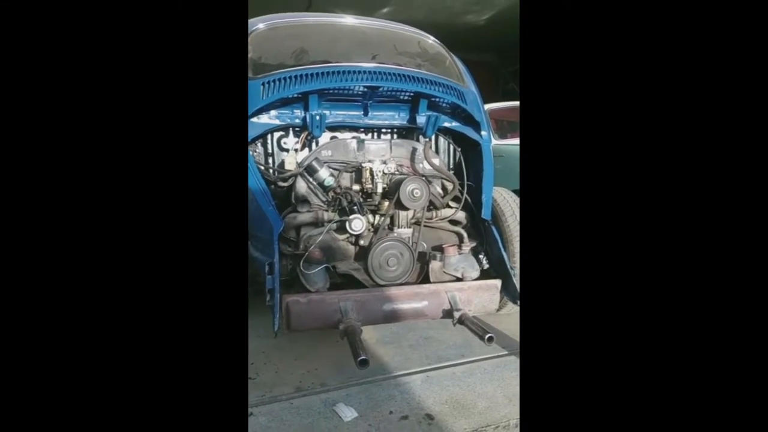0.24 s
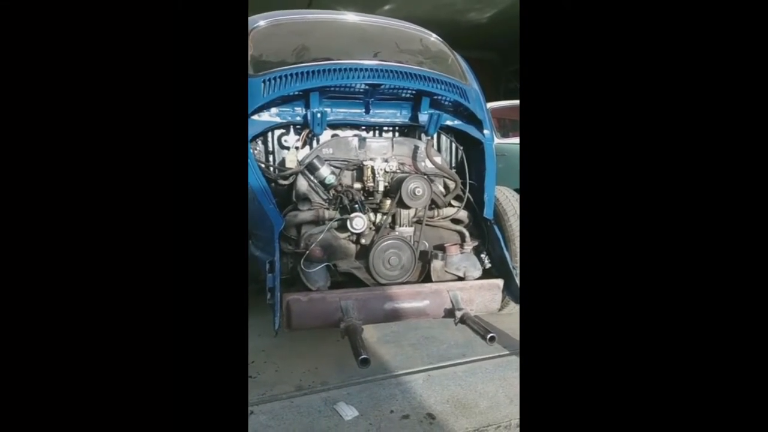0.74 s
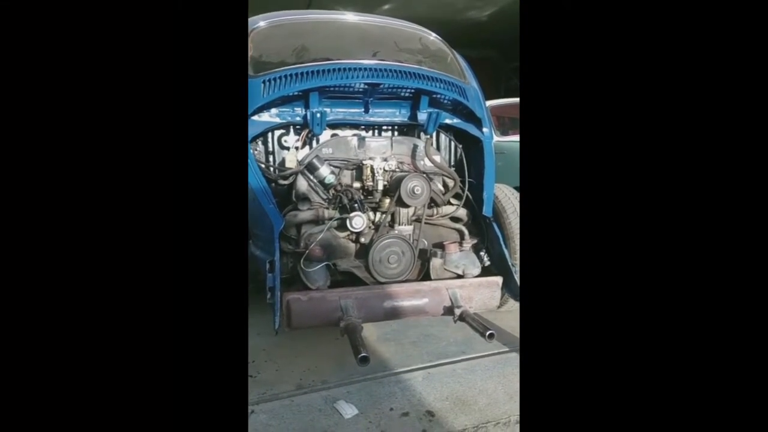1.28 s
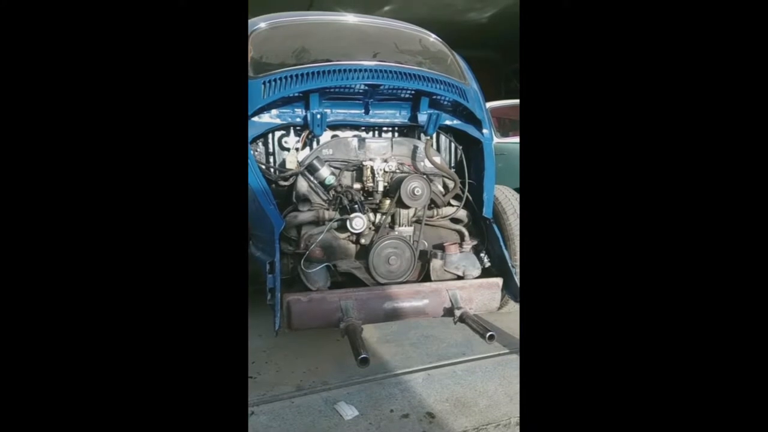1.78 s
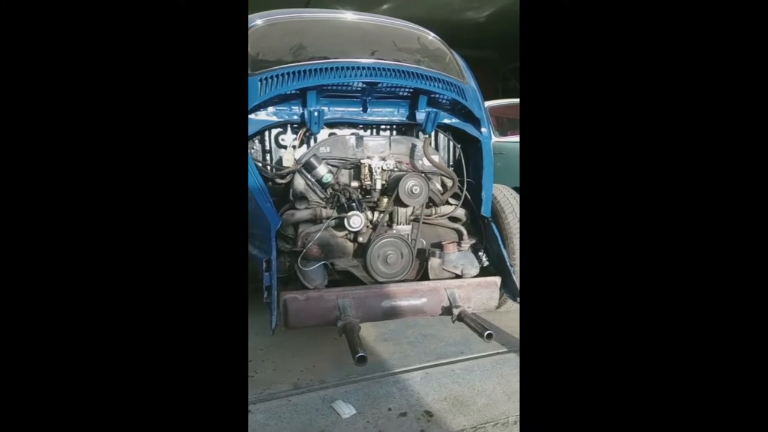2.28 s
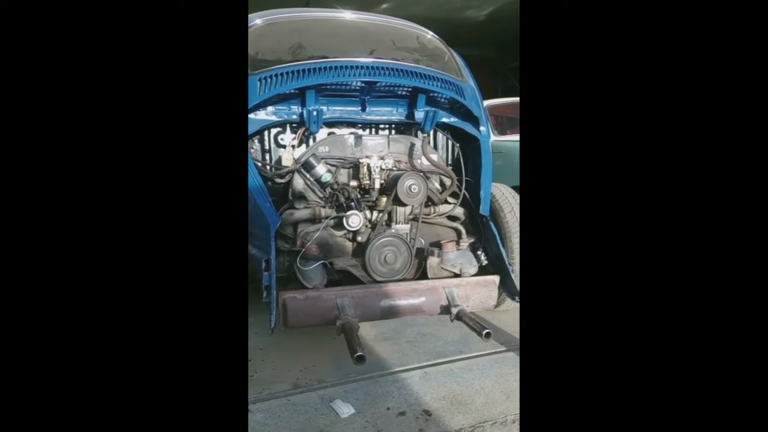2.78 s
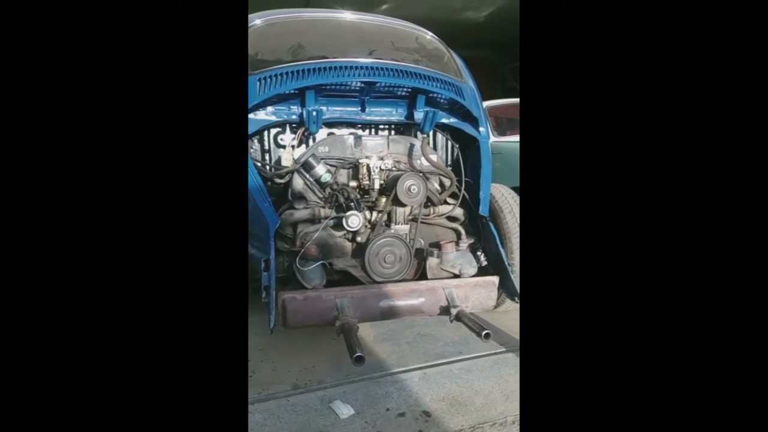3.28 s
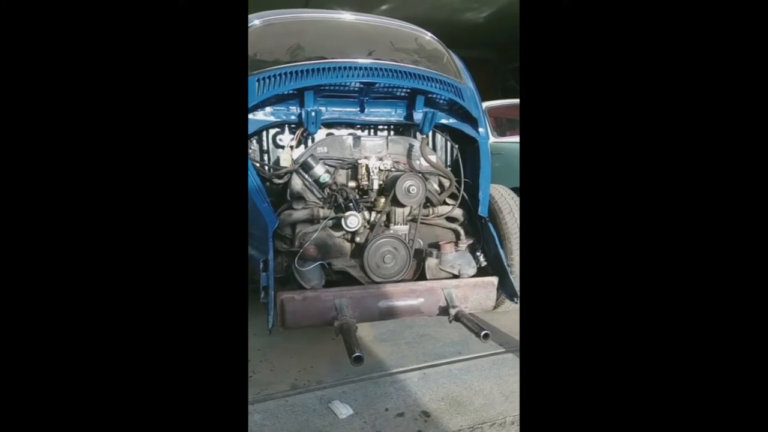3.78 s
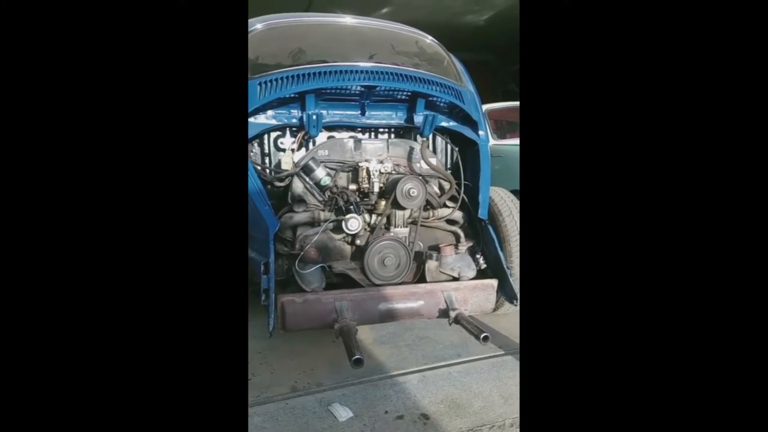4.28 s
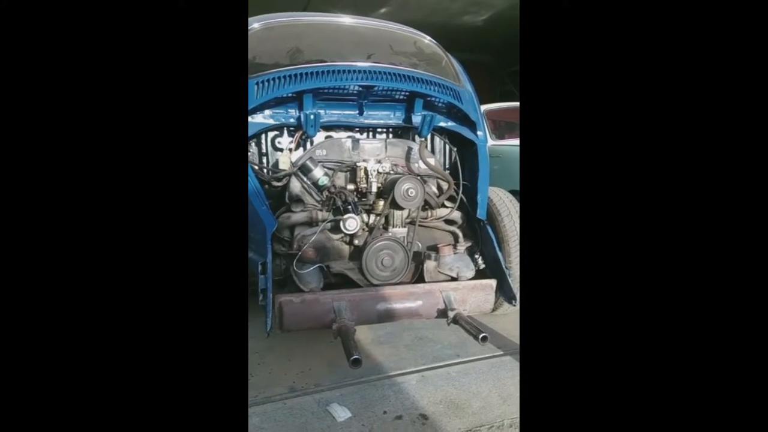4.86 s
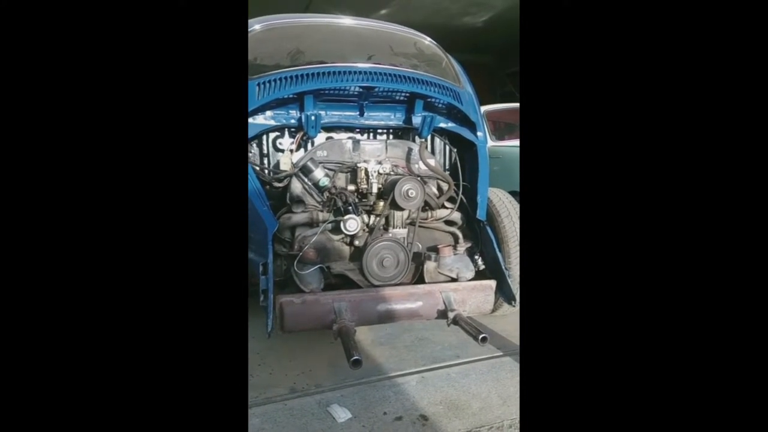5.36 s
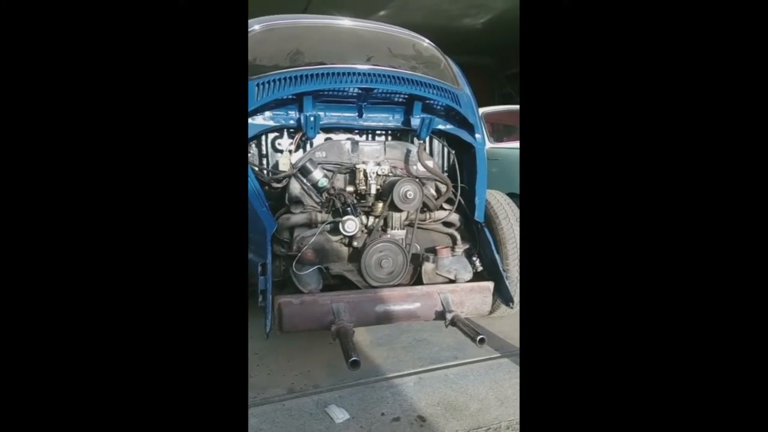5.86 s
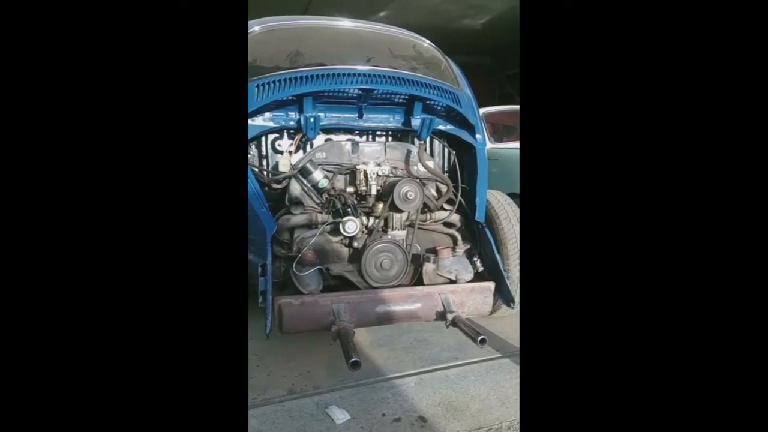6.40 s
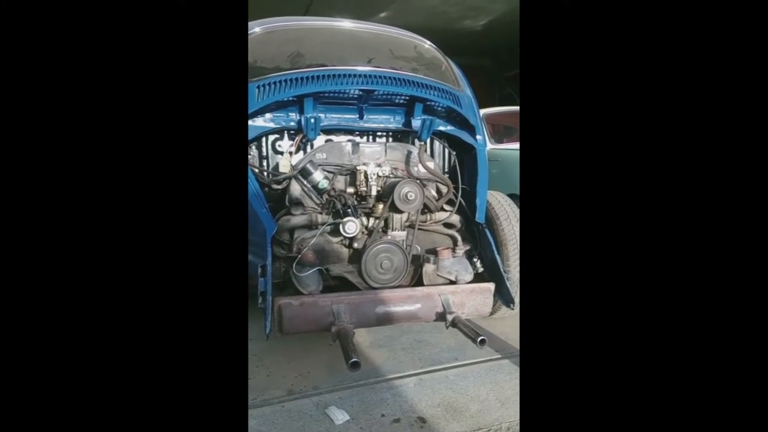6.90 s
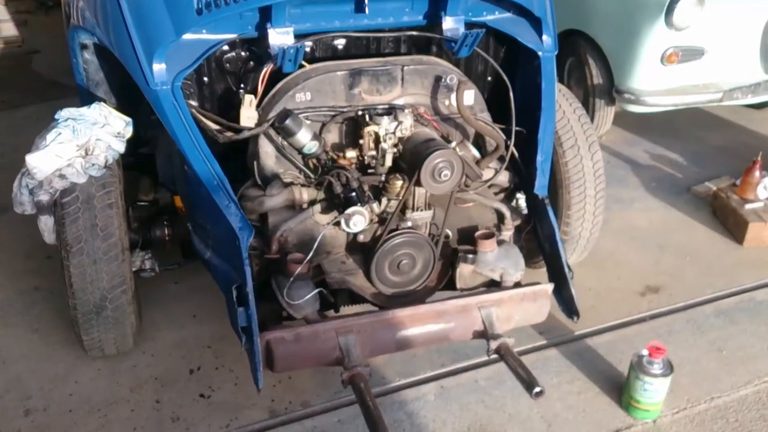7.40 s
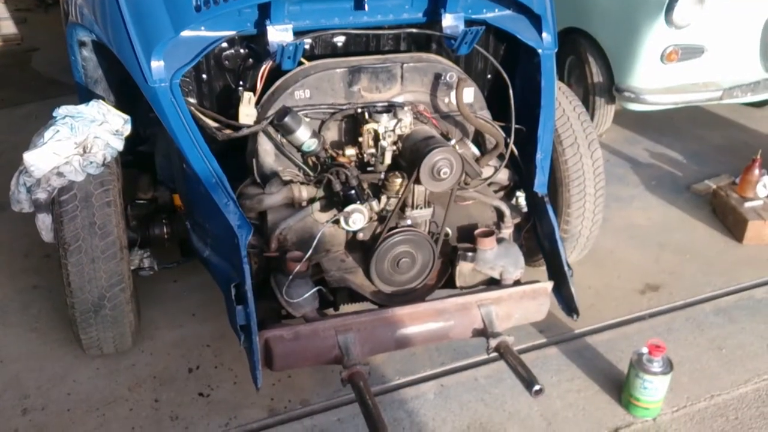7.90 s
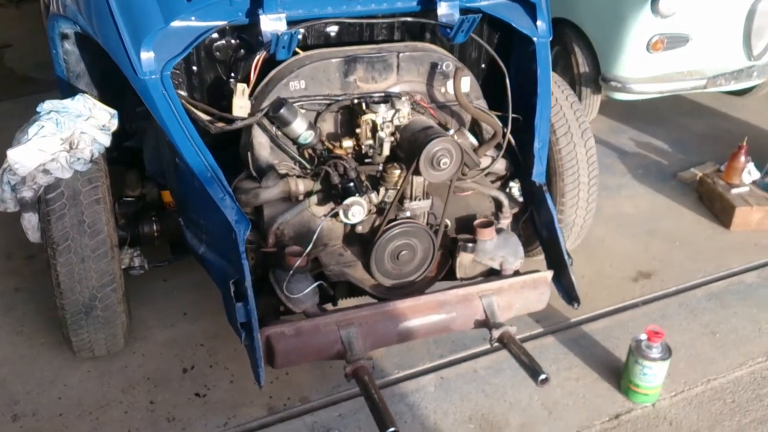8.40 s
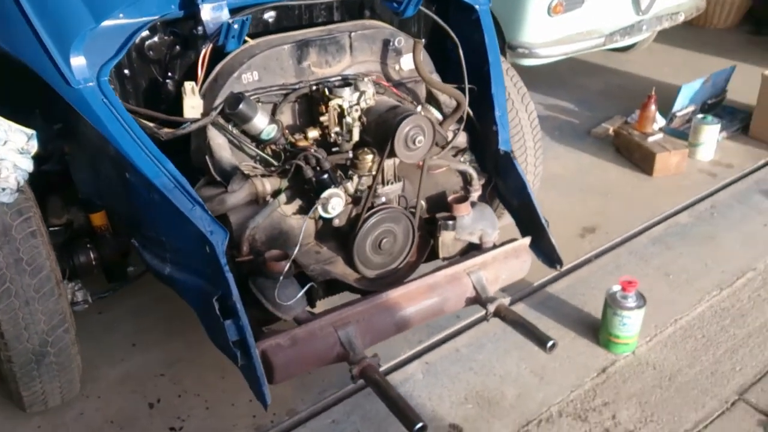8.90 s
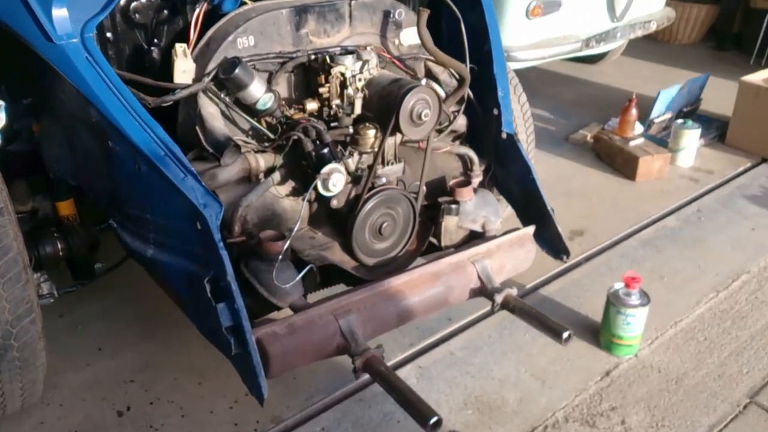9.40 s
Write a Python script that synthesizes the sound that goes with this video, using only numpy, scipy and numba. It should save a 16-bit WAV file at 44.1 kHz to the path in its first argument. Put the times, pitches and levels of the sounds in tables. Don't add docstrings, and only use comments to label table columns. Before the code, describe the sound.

An air-cooled engine idles fast and rough with clattering valves and fan roar, fades briefly to silence, then returns quieter with soft exhaust pops.

```python
import sys
import numpy as np
from scipy import signal
from scipy.fft import rfft, irfft, dct, next_fast_len
from scipy.io import wavfile
from scipy.ndimage import uniform_filter1d
from numba import njit

SR = 44100
rng = np.random.default_rng(int(sys.argv[2]) if len(sys.argv) > 2 else 0)


def ratio(d):
    e = np.asarray(d, float) / 20
    return 10 ** e


def to_wav(s):
    ch = np.atleast_2d(s).T
    pcm = np.round(np.clip(ch, -1, 1) * 32767)
    wavfile.write(sys.argv[1], SR, pcm.astype(np.int16))


N = 425565


def level(x, db):
    return x * ratio(db) / np.sqrt(np.mean(x ** 2))


def on_log(hz, table):
    return np.interp(np.log(hz), np.log([r[0] for r in table]), [r[1] for r in table])


def walk(count, rate):
    hold = int(SR / rate)
    steps = np.repeat(rng.standard_normal(count // hold + 1), hold)
    return 1.4 * uniform_filter1d(steps, hold)[:count]


def train(count, when, size):
    return np.bincount(np.clip(when * SR, 0, count - 1).astype(int), size, count)


def ring(x, hz, t60):
    t = np.arange(int(t60 * SR)) / SR
    mode = np.sin(2 * np.pi * hz * t) * 1000. ** (-t / t60)
    return signal.oaconvolve(x, mode)[:len(x)]


def puff(x, hz, swell_s=.0065):
    t = np.arange(SR // 16) / SR
    cycles = np.sin(2 * np.pi * hz * t) * t / swell_s * np.exp(1 - t / swell_s)
    return signal.oaconvolve(x, cycles)[:len(x)]


RUMBLE_DB = [-31, -36.5]


def rumble(count, view):
    band = signal.butter(2, (20, 120), "band", fs=SR, output="sos")
    return level(signal.sosfilt(band, rng.standard_normal(count)), RUMBLE_DB[view])


# (frequency [Hz], spectral density [dB per Hz])
BODY = [
    [(180, -3), (310, -7.5), (515, -7.5), (727, -1.5), (900, -6.5), (1150, -2.5), (1310, -5.5), (2150, -9),
     (2450, -14.5), (2700, -11.5), (3630, -12), (4200, -9.5), (6330, -12.5), (7970, -11.5), (15600, -26.5)],
    [(180, -3.5), (300, -7.5), (384, -9), (469, -1.5), (879, -3.5), (970, -7), (1570, -6.5), (2220, -10),
     (3190, -7), (3470, -9), (5240, -13), (6500, -11.5), (9820, -18.5), (12400, -7), (15600, -19.5)],
]
BODY_DB = [-19.5, -22]
# (frequency [Hz], width [Hz], lift [dB])
SHROUD = [
    [(566, 55, 4.5), (740, 130, 1), (1140, 61, 2), (2180, 170, 6), (2760, 120, 3), (7620, 1450, 4)],
    [(626, 200, -0.5), (1606, 60, 4.5), (3125, 120, 2), (6970, 190, -0.5), (7430, 330, 1.5)],
]
# (frequency [Hz], level against the steady fan [dB])
BURSTS = [(300, -5), (700, -4), (1500, -3), (3000, -3), (4300, -11), (8000, 1), (12000, 1.5)]
CYLINDER_DB = [
    [-5, -6.5, -2, -6.5],
    [-5.5, -3, -5, -4],
]
KNOCK_S = [0.018, 0.015, .011, 0.0088, .0073, 0.0069, .0073]
CLICK_LEAD_S = [
    [.004, .0054, .0064, .0054],
    [.0076, .0062, .0062, .007],
]


def valve_knocks(t, fired, view, chance):
    gates = []
    for part, (own, knock_s) in enumerate(zip(chance[1:], KNOCK_S)):
        decay = np.exp(-np.arange(SR // 20) / SR / knock_s)
        lead = .004 if part < 4 else np.resize(CLICK_LEAD_S[view], len(fired))
        hits = ratio(np.resize(CYLINDER_DB[view], len(fired)) + 1.9 * chance[0] + 2.74 * own)
        knocks = train(len(t), fired - t[0] - lead, hits)
        gates.append(level(signal.oaconvolve(knocks, decay)[:len(t)], 0))
    return gates


def machinery(t, fired, view, swell_db):
    n, size = len(t), next_fast_len(len(t))
    hz = np.arange(1, size // 2 + 2) * SR / size
    octave = np.log2(hz)
    colour_db = on_log(hz, BODY[view])
    for mode_hz, width, lift_db in SHROUD[view]:
        colour_db = colour_db + lift_db / (1 + (2 * (hz - mode_hz) / width) ** 2)
    ripple = uniform_filter1d(rng.standard_normal(len(hz)), size=size // 2500)
    colour_db += 1.3 * level(ripple, 0)
    noise = rfft(rng.standard_normal(size)) * ratio(colour_db)
    chance = np.clip(rng.standard_normal((len(fired), 8)).T, -2, 1.7)
    gates = valve_knocks(t, fired, view, chance)
    out, gust = 0, walk(n, 5.8)
    for k, centre in enumerate(200 * 2 ** (np.arange(20) / 3)):
        weight = np.clip(1 - abs(3 * (octave - np.log2(centre))), 0, 1)
        band = irfft(noise * weight, size)[:n]
        gate = np.sqrt(1 + (ratio(on_log(centre, BURSTS)) * gates[k // 3]) ** 2)
        region = int(centre > 2800) + int(centre > 5800)
        db = swell_db[region] + .35 * gust + 1.1 * walk(n, 19)
        out = out + band * level(gate, 0) * ratio(db)
    return level(out, BODY_DB[view])


# (frequency [Hz], level [dB], t60 [s])
TAPPET = [
    [(4055, -36.5, 0.026), (4410, -37, 0.039), (4800, -40, 0.01), (5140, -40.5, 0.022), (8170, -37.5, .015)],
    [(3160, -52, 0.027), (6620, -50, .03), (12240, -43, 0.013)],
]
# (cylinder [index], lead before firing [s])
TAPPET_AT = [(2, .004), (0, .006)]


def tappet(t, fired, view):
    cylinder, lead = TAPPET_AT[view]
    when, out = fired[cylinder::4] - t[0] - lead, 0
    chance = np.clip(rng.standard_normal((len(when), 6)).T, -2, 1.3)
    decay = np.exp(-np.arange(SR // 40) / SR / .006)
    for k, (hz, db, t60) in enumerate(TAPPET[view]):
        strength = ratio(1.8 * chance[-1] + 1.7 * chance[k])
        hits = train(len(t), when + .0012 * chance[k - 1], strength)
        rattle = signal.oaconvolve(hits, decay)[:len(t)] * rng.standard_normal(len(t))
        out = out + level(ring(rattle, hz, t60), db)
    return out


# (time [s], level [dB], frequency [Hz])
POPS = [
    (8.0945, -9.5, 66),
    (8.138, -18, 65),
    (8.217, -22, 70),
    (8.425, -19, 70),
    (8.84, -20, 70),
    (8.93, -20, 65),
    (9.612, -21, 70),
]


def pops():
    out = 0
    for s, db, hz in POPS:
        out = out - 1.6 * ratio(db) * ring(train(N, np.array([s]), [1.]), hz, .075)
    return out


# (frequency [Hz], t60 [s], near bank gain, far bank gain); minus is a suction wave
SILENCER = [
    [(67.6, .121, -.465, -.443), (90.9, .049, -.227, .517), (165.8, .12, .494, .025),
     (226.9, .12, .025, -.12), (290, .07, .085, .015)],
    [(55, .051, -.447, -.127), (85, .12, .885, -.32), (185.7, .113, -.294, .386), (271.6, .12, -.34, .014),
     (355, .1, .04, .04)],
]
# (size scatter [dB], time scatter [s],
# mismatch of paired cylinders in the top modes [0-1], uneven burn [0-1])
BLOW = [(.5, .0001, .1, .1), (.5, .0001, .5, .09)]
# (near bank [s], far bank [s])
LEAD_S = [(.01, .0111), (.0003, -.0034)]
# (time [s], level [dB])
MISFIRES = [(0.227, -4), (0.542, -18), (0.921, -20), (1.166, 0), (1.234, -3), (1.617, -6), (1.81, -6),
            (1.943, -18), (2.073, -20), (2.324, -3), (2.451, -7), (2.707, 1), (2.739, -11), (3.864, -21),
            (4.313, -20), (4.367, -2), (4.442, -10), (4.664, 0), (4.707, -19), (5.156, -4), (5.488, -11),
            (5.821, -24), (6.603, -15)]
# (cylinder [index], delay [s], frequency [Hz], size)
CHUG = [(2, .0071, 245, .27), (0, .0044, 248, .32)]


def exhaust(t, fired, view):
    scatter_db, jitter, mismatch, uneven = BLOW[view]
    n, count = len(t), len(fired)
    chance = rng.standard_normal((count, 3)).T
    when = fired - t[0] - np.resize(LEAD_S[view], count) + jitter * chance[1]
    out = 0
    for k, (hz, t60, near, far) in enumerate(SILENCER[view]):
        pair = mismatch * (k >= 3)
        gain = np.resize([near * (1 + pair), far, near * (1 - pair), far], count)
        out = out + ring(train(n, when, gain * ratio(scatter_db * chance[0])), hz, t60)
    out = level(signal.oaconvolve(out, signal.windows.gaussian(161, 22), "same"), 0)
    far_fired = fired[1::2]
    cough = uneven * chance[2, 1::2]
    for s, db in MISFIRES:
        if t[0] < s < t[-1]:
            cough[np.argmin(abs(far_fired - s))] = 1.56 * (1 - ratio(db))
    cylinder, late, hz, size = CHUG[view]
    chugs = train(n, fired[cylinder::4] - t[0] + late, size * ratio(2 * chance[0, cylinder::4]))
    out += puff(chugs, hz, .005)
    return out + puff(train(n, far_fired - t[0] - .009, cough), 82.)


# (time [s], speed [crank turns per s])
SPEED = [
    [(0, 32.79), (.37, 32.33), (1.29, 31.0), (1.58, 31.52), (2.13, 30.97), (2.9, 31.33), (3.65, 31.35),
     (4.21, 31.07), (4.84, 30.29), (4.96, 30.86), (5.89, 29.68), (6.3, 31.21), (6.97, 31.49)],
    [(6.97, 35.19), (8.37, 35.48), (8.44, 35.63), (9.18, 35.38), (9.65, 35.67)],
]
START_TURN = [.022, -.218]
# (time [s], level [dB])
NEARNESS = [
    [(0, -3), (.05, -1.6), (.55, -0.2), (1.05, 0.4), (1.6, -.5), (3, .1), (4.5, -0.7), (5, 0.4),
     (5.5, -0.2), (6.3, 1.2), (6.7, 0.6)],
    [(7.2, 0.2), (8.05, -0.2), (8.2, 1), (8.27, -4), (9.1, -3.5), (9.65, -2)],
]
# (exhaust, shroud, valve gear, hiss [dB per dB])
FOLLOW = [(1.1, 0.85, .6, 1.1), (1, .9, 1.12, 0.17)]
EXHAUST_DB = [-13.5, -22.5]


def engine(t, view):
    turns = START_TURN[view] + np.cumsum(np.interp(t, *np.transpose(SPEED[view]))) / SR
    fired = np.interp(np.arange(2 * turns[-1]) / 2, turns, t)
    near_db = np.interp(t, *np.transpose(NEARNESS[view]))
    low_db, *rest = (share * near_db for share in FOLLOW[view])
    turn_s, turn_takes_s, facing_db = 1.1, .091, 4.5
    rest[2] = rest[2] + facing_db * np.clip((turn_s - t) / turn_takes_s + .5, 0, 1)
    swell_db = [db - db.mean() for db in rest]
    out = rumble(len(t), view) * ratio(low_db - low_db.mean())
    out = out + machinery(t, fired, view, swell_db)
    out = out + tappet(t, fired, view) * ratio(swell_db[1])
    return out + exhaust(t, fired, view) * ratio(EXHAUST_DB[view] + low_db)


@njit
def svf(x, hz, width):
    y, band, low = np.empty(len(x)), 0., 0.
    for i in range(len(x)):
        g, k = np.tan(np.pi * hz[i] / SR), width / hz[i]
        v = (band + g * (x[i] - low)) / (1 + g * (g + k))
        band, low, y[i] = 2 * v - band, low + 2 * g * v, k * v
    return y


def hand_notch(x):
    port_hz, width_hz, mean_depth = 9800, 1000., .78
    centre = port_hz * (1 + .03 * walk(len(x), 6) + .02 * walk(len(x), 35))
    depth = np.clip(mean_depth + .22 * walk(len(x), 20), 0, 1)
    return x - depth * svf(x, centre, width_hz)


def fade(t):
    silent_s, fade_out_s, fade_in_s = 6.955, .26, .2
    shut_s, open_s, tail_s = 6.936, 6.984, .004
    ramp = np.clip(np.maximum((silent_s - t) / fade_out_s, (t - silent_s) / fade_in_s), 0, 1)
    gate = np.where(t < open_s, np.exp(-np.clip(t - shut_s, 0, 1) / tail_s), 1)
    return ramp * gate


def scene():
    t, cut = np.arange(N) / SR, int(6.97 * SR)
    behind = engine(t[:cut], 0)
    beside = hand_notch(engine(t[cut:], 1))
    return ((np.concatenate([behind, beside]) + pops()) * fade(t))[None]


# (time [s], lower edge [Hz], share of lines kept [0-1])
THINNED = [(1.385, 3000, .05), (1.625, 8800, .03), (2.737, 380, .018), (3.389, 2500, .08),
           (3.455, 2500, .1), (5.804, 5000, .05), (6.756, 2000, .09), (7.012, 1500, 0), (7.248, 1200, .05),
           (7.29, 1200, .035), (7.4, 1500, .05), (7.44, 3500, .05), (7.602, 500, .015), (7.912, 800, .05),
           (8.016, 2000, .05), (8.188, 1500, .04), (8.23, 1500, .05), (8.684, 500, .04), (9.436, 600, .008),
           (9.49, 1500, .05), (9.615, 800, .05)]


def thin_spectrum(x):
    for s, from_hz, keep in THINNED:
        half, edge = (1400, 12) if 0 < keep < .02 else (1024, .6)
        window = signal.windows.kaiser_bessel_derived(2 * half, edge)
        part = slice(int(s * SR) - half, int(s * SR) + half)
        lines = dct(x[0, part] * window, norm="ortho")
        index = np.arange(2 * half)
        rank = abs(lines) / uniform_filter1d(abs(lines), size=half // 2)
        rank = rank * (1 + 900 / (index + 300)) ** .55
        lost = rank < np.quantile(rank, 1 - .6 * keep - .02)
        change = np.where(lost, -1, .5) * (index * SR / 4 / half > from_hz)
        x[0, part] += dct(lines * change, type=3, norm="ortho") * window
    return x


def roll_off(x):
    return signal.sosfilt(signal.butter(12, 16940, fs=SR, output="sos"), x)


def record(dry):
    x = signal.sosfilt(signal.butter(2, 38, "high", fs=SR, output="sos"), dry)
    x = np.tanh(.9 * x) / .9
    x = signal.sosfilt(signal.ellip(10, .3, 60, 15800, fs=SR, output="sos"), x)
    mix = thin_spectrum(x) - .0006
    return roll_off(mix)


dry = scene()
out = record(dry)
to_wav(out)
```